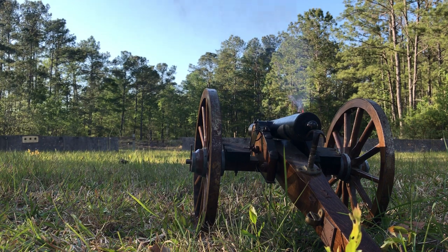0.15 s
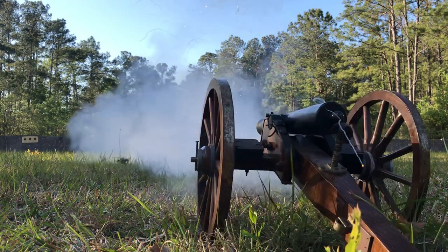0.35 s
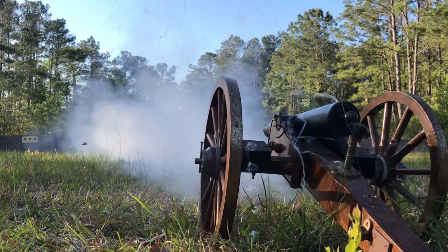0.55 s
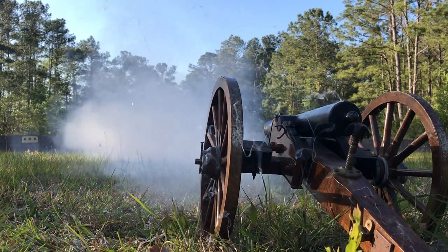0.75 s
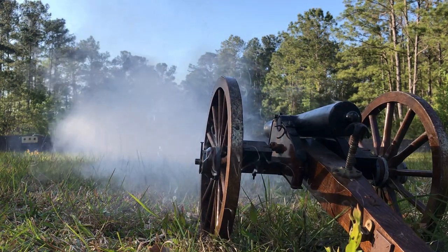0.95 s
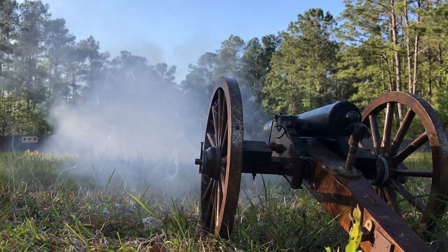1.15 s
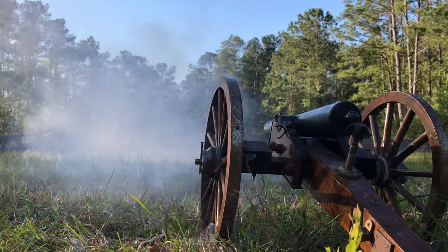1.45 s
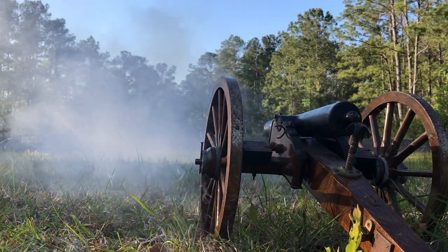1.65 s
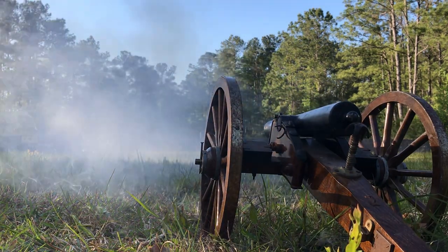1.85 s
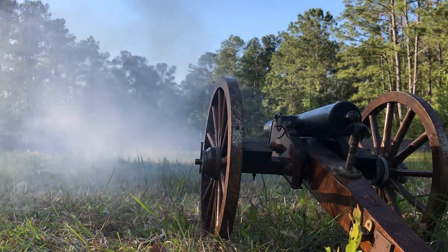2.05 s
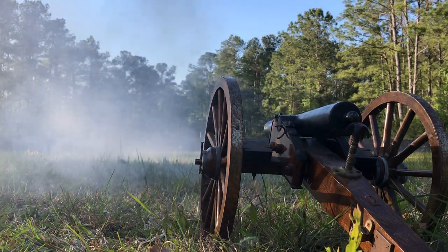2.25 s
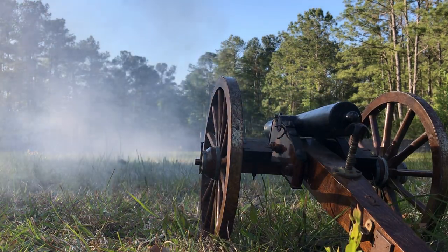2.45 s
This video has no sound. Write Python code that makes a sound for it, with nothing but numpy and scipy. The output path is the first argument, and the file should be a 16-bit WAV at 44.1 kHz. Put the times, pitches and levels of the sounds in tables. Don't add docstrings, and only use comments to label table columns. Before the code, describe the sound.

A close cannon shot in a tree-ringed clearing, mono phone sound. Quiet fuse hiss until 0.22 s, a muffled shudder and spitting, then a hard, clipped blast at 0.25 s, collapsing within about 0.1 s. Low thuds and rumble answer, strongest from 0.47 to 0.83 s, again at 1.15 s, while leafy wash darkens. Sparse debris ticks, one clear at 2.07 s; faint airy hiss remains to about 2.6 s.

```python
import sys
import numpy as np
from scipy import signal
from scipy.fft import rfft, irfft, next_fast_len
from scipy.io import wavfile
from scipy.ndimage import uniform_filter1d

SR = 44100
rng = np.random.default_rng(int(sys.argv[2]) if len(sys.argv) > 2 else 0)


def natural_amplitude(level_db):
    exponent = np.asarray(level_db, float) / 20
    return 10 ** exponent


def log_audio(samples):
    frames = np.atleast_2d(samples).T
    limited = np.clip(frames, -1, 1)
    pcm = np.round(limited * 32767).astype(np.int16)
    wavfile.write(sys.argv[1], SR, pcm)


N = 114660


def noise():
    return rng.standard_normal(N)


def unit(x):
    return x / np.sqrt(np.mean(x ** 2) + 1e-20)


def along(points, hz):
    f, v = np.transpose(points)
    return np.interp(np.log(hz + 1), np.log(f + 1), v)


def level(rows):
    s, db = np.transpose(rows)
    return natural_amplitude(np.interp(np.arange(N) / SR, s, db, left=-150))


def colour(x, spectrum):
    m = next_fast_len(N + 8192)
    gain = natural_amplitude(along(spectrum, np.fft.rfftfreq(m, 1 / SR)))
    return unit(irfft(rfft(x, m) * gain, m)[:N])


def patchy(x, patchy_db, air=((1, 0),), from_s=0):
    hz, t, z = signal.stft(x, SR, nperseg=512)
    field = rng.standard_normal(z.shape)
    field = uniform_filter1d(field, size=6, axis=0)
    field = unit(uniform_filter1d(field, size=6, axis=1))
    loss_db = along(air, hz)[:, None] * np.clip(t - from_s, -.08, None)
    return signal.istft(z * natural_amplitude(patchy_db * field - loss_db), SR, nperseg=512)[1][:N]


def add(out, s, piece):
    part = out[round(s * SR):][:len(piece)]
    part += piece[:len(part)]


def fuse():
    # f/Hz, level/dB per Hz
    fuse_tone = [(40, -12), (100, -1.5), (400, -4), (900, -11), (1900, -5), (4400, -3.5), (6500, -7.5),
                 (15700, -8.5)]
    # f/Hz, width/Hz, depth/dB
    ground_dips = [(1288.3, 350, 5.5), (2988, 560, 11.5), (7366, 540, 3.5), (10615, 170, 11),
                   (13500, 300, 13)]
    level_db, end_s = -56.5, .224
    spectrum = rfft(colour(noise(), fuse_tone))
    f = np.fft.rfftfreq(N, 1 / SR)
    dips_db = sum(db * np.exp(-((f - hz) / w) ** 2) for hz, w, db in ground_dips)
    hiss = unit(patchy(irfft(spectrum * natural_amplitude(-dips_db), N), 0.95))
    return hiss * natural_amplitude(level_db) * (np.arange(N) / SR < end_s)


def shudder():
    # t/s, level/dB
    shudder_level = [
        (.2225, -41.5),
        (.231, -27),
        (.234, -32),
        (.240, -16),
        (.246, -18),
        (.25, -62.5),
        (.26, -120),
    ]
    # f/Hz, level/dB per Hz
    shudder_tone = [(100, -20.5), (300, 1), (900, -0.5), (1700, -26), (2900, -14.5), (4200, -38.5),
                    (15700, -43.5)]
    return colour(noise(), shudder_tone) * level(shudder_level)


def priming():
    # t/s, level/dB
    spits = [
        (0.223, -34.5),
        (0.2256, -31.5),
        (0.2278, -25),
        (0.2342, -33),
    ]
    t60_s = .014
    out, t = np.zeros(N), np.arange(SR // 2) / SR
    for s, db in spits:
        add(out, s, natural_amplitude(db - 60 * t / t60_s) * rng.standard_normal(len(t)))
    return out


def vent():
    # t/s, level/dB
    vent_level = [
        (.2245, -46.5),
        (.245, -52.5),
        (.268, -41.5),
        (.31, -49),
        (.42, -58),
        (.445, -67),
        (.48, -58),
        (.68, -65),
        (.73, -84),
    ]
    # f/Hz, level/dB per Hz
    vent_tone = [(2000, -21), (6000, -3.5), (10000, 0.5), (15700, 3)]
    return patchy(colour(noise(), vent_tone), 1.4) * level(vent_level)


def ringing():
    # t/s, f/Hz, level/dB, rise/s, t60/s
    rings = [(.2300, 310, -14.5, 0.0023, 0.036), (0.2344, 2920, -24, .002, .03),
             (.2372, 520, -4, 0.002, .03), (.2402, 250, -0.5, .002, 0.038), (.2585, 54, 1, 0.0063, 0.11),
             (.2590, 680, -12, .002, .05), (.2645, 476.5, -9.5, .002, .07), (0.283, 1490, -23.5, .002, .03),
             (.2885, 230, -12.5, 0.0026, .05), (0.2947, 421, -16, 0.0017, .06),
             (.2965, 645, -17, .003, 0.052), (0.3, 420, -11.5, 0.0014, 0.017),
             (.340, 573, -19, 0.0022, 0.03), (.3420, 160, -1, .002, 0.017)]
    out, t = np.zeros(N), np.arange(SR // 2) / SR
    for s, hz, db, rise, t60 in rings:
        swell = 1 - np.exp(-(t / rise) ** 2)
        add(out, s, natural_amplitude(db - 60 * t / t60) * swell * np.sin(2 * np.pi * hz * t))
    return out


def blast():
    # f/Hz, level/dB per Hz
    front_tone = [(120, -30), (300, -6), (800, 0), (1500, -10.5), (2800, -10), (3900, -8), (6000, -12),
                  (15700, -20)]
    # f/Hz, level/dB per Hz
    roll_tone = [(150, -30.5), (250, 6), (2590, -17), (3660, -20.5), (4830, -28), (5750, -25.5),
                 (6380, -33.5), (15700, -39)]
    front_s, front_db, front_hold_s, sag_db, front_t60_s = .2461, -8.5, 0.01, 3, 0.061
    roll_s, roll_db, roll_hold_s, roll_rise_s, roll_t60_s = .255, -14.5, .014, 0.0014, 0.039
    out, t = np.zeros(N), np.arange(SR // 2) / SR

    fall_db = sag_db * np.minimum(t / front_hold_s, 1)
    fall_db = fall_db + 60 * np.maximum(t - front_hold_s, 0) / front_t60_s
    add(out, front_s, natural_amplitude(front_db - fall_db) * colour(noise(), front_tone)[:len(t)])

    roll = natural_amplitude(roll_db - 60 * np.maximum(t - roll_hold_s, 0) / roll_t60_s)
    roll = roll * (1 - np.exp(-t / roll_rise_s))
    add(out, roll_s, roll * colour(noise(), roll_tone)[:len(t)])
    return out


def trunks():
    # t/s, level/dB
    trunk_level = [(.27, -43), (.29, -27.5), (.44, -34.5), (.6, -36.5), (.71, -38.5), (.8, -36),
                   (1.15, -37), (1.7, -46.5), (2.6, -54)]
    # f/Hz, level/dB per Hz
    trunk_tone = [(18, -55.5), (30, -18), (59, -6.5), (199, 1.5), (256, -0.5), (386, -12.5), (529, -11),
                  (1180, -34.5), (1300, -28.5), (1690, -55), (2860, -120)]
    # f/Hz, loss/dB per s
    trunk_air = [(100, 0.5), (400, 0.5), (1000, 1.5)]
    hits_per_s, scatter_db, blur = 600, 3, .9
    chance, side, size = rng.random((3, N))
    hits = (chance < hits_per_s / SR) * np.sign(side - .5)
    hits = hits * natural_amplitude(-scatter_db * np.log(size + .06))
    hits = unit(hits) + blur * noise()
    return patchy(colour(hits, trunk_tone), 0.43, trunk_air, 0.75) * level(trunk_level)


def foliage():
    # t/s, level/dB
    leaf_level = [(.27, -52), (.30, -35.5), (.357, -46), (.37, -37.5), (.44, -40.5), (.53, -38), (.68, -47),
                  (1.02, -53.5), (2.2, -92.5)]
    # f/Hz, level/dB per Hz
    leaf_tone = [(600, -23), (800, -3.5), (1150, -7.5), (2100, 1), (3300, -2.5), (6000, -12), (9000, -27),
                 (13000, -47)]
    # f/Hz, loss/dB per s
    leaf_air = [(1500, -9), (3000, 5.5), (5000, 21.5), (7000, 50), (10000, 120)]
    return patchy(colour(noise(), leaf_tone), 2.2, leaf_air, 0.51) * level(leaf_level) * natural_amplitude(-0.5)


def debris():
    # t/s, peak level/dB, thinness/0-1
    ticks = [(0.3381, -40, 0.7), (0.5435, -38, 0.8), (0.6409, -48, 0.8), (0.674, -49.5, 0.6),
             (0.6856, -53.5, 0.78), (0.7714, -63, 0.8), (0.8334, -61, 0.7), (0.8934, -53, 0.9),
             (0.9243, -55, 0.8), (1.1239, -60, 0.73), (1.1927, -60.5, 0.68), (1.2393, -60.5, 0.8),
             (1.3502, -67.5, 0.81), (1.6674, -62, 0.7), (1.7425, -57.5, 0.7), (2.0688, -40, 0.6)]
    # t/s, level/dB, length/s
    rustles = [
        (1.11, -79, .025),
        (2.0705, -62, .010),
        (2.576, -69, .03),
    ]
    twig_s, twig_db, twig_hz, twig_t60_s = 2.0686, -53, 1100, .008
    out, t = np.zeros(N), np.arange(SR // 10) / SR
    for s, db, thin in ticks:
        hiss = rng.standard_normal(len(t) + 1)
        hiss = hiss[1:] - np.clip(thin, 0, 1) * hiss[:-1]
        add(out, s, natural_amplitude(db + 0.5 - 60 * t / 0.0037) * hiss)
    add(out, twig_s, natural_amplitude(twig_db - 60 * t / twig_t60_s) * np.sin(2 * np.pi * twig_hz * t))
    for s, db, length in rustles:
        fade = natural_amplitude(db - 60 * np.maximum(t - length, 0) / 0.013)
        add(out, s, fade * signal.lfilter([1, -.6], 1, rng.standard_normal(len(t))))
    return out


def thuds():
    # t/s, peak level/dB, f/Hz
    thud_echoes = [(0.406, -36, 180), (0.474, -20, 233), (0.566, -24.5, 231), (0.65, -26.5, 220),
                   (0.742, -23.5, 168), (0.779, -51, 220), (0.796, -25.5, 200), (0.823, -25.5, 163.5),
                   (1.155, -31.5, 197.5), (1.495, -40, 200), (1.626, -37.5, 184), (2.003, -44.5, 198.9),
                   (2.1, -48, 197.4), (2.54, -45.5, 201.5)]
    cycles = 0.95
    out, t = np.zeros(N), np.arange(-2000, 2000) / SR
    for s, db, hz in thud_echoes:
        pulse = np.exp(-(t * hz / cycles) ** 2) * np.cos(2 * np.pi * hz * t)
        add(out, s + t[0], -natural_amplitude(db) * pulse)
    return out


def clearing_air():
    # f/Hz, level/dB per Hz
    floor_tone = [(880, -52), (1500, 1), (2240, 1), (2550, 0), (4420, 1.5), (5020, -1), (8290, -2),
                  (15700, -6.5)]
    # t/s, level/dB
    gain_back = [
        (.7, -83),
        (1, -78.5),
        (1.8, -76),
        (2.6, -75),
    ]
    return patchy(colour(noise(), floor_tone), 1.9) * level(gain_back)


def far_edge():
    # f/Hz, level/dB per Hz
    far_tone = [(1800, -34), (2800, -10), (4500, -17), (7000, -25), (9000, -40)]
    start_s, level_db, rise_s, t60_s = 1.362, -65.5, 0.01, 0.57
    out, t = np.zeros(N), np.arange(SR) / SR
    swell = natural_amplitude(level_db - 60 * t / t60_s) * (1 - np.exp(-t / rise_s))
    add(out, start_s, swell * colour(noise(), far_tone)[:SR])
    return out


def scene():
    cannon = fuse() + shudder() + priming() + vent() + ringing() + blast()
    echoes = trunks() + foliage() + thuds() + far_edge()
    return (cannon + echoes + debris() + clearing_air())[None]


def low_pass(x):
    return signal.sosfilt(signal.butter(12, 16660, fs=SR, output="sos"), x)


def record(dry):
    clip_top, clip_hard = .7, 6
    top_hz, top_width_hz = 15600, 70
    x = dry / (1 + np.abs(dry / clip_top) ** clip_hard) ** (1 / clip_hard)
    f = np.fft.rfftfreq(N, 1 / SR)
    band = (1 - np.tanh((f - top_hz) / top_width_hz)) / 2
    return low_pass(irfft(rfft(x) * band, N))


dry = scene()
out = record(dry)
log_audio(out)
```